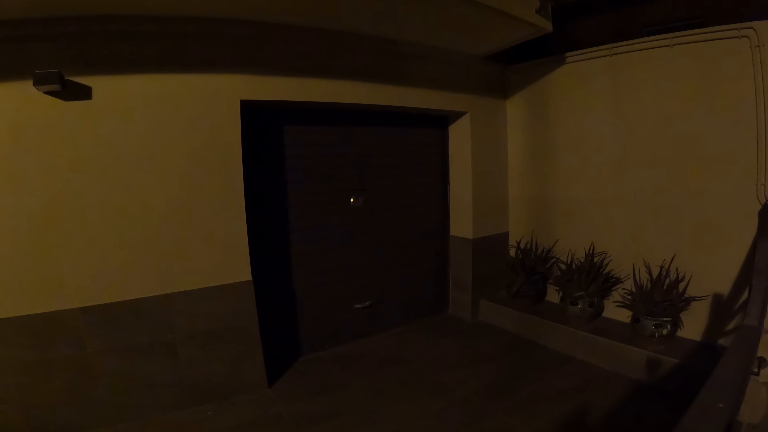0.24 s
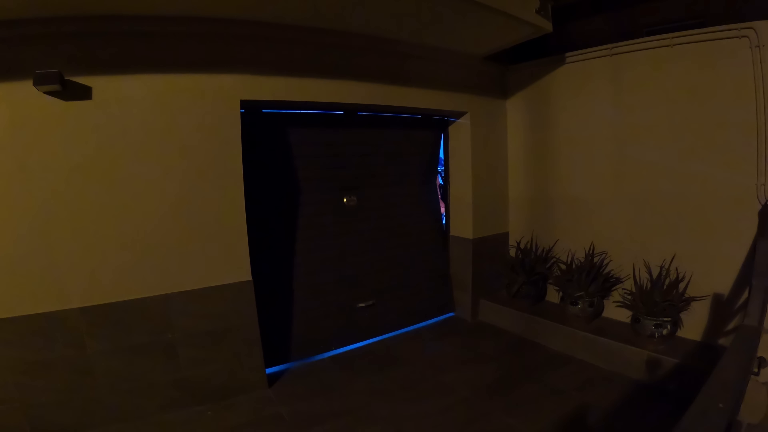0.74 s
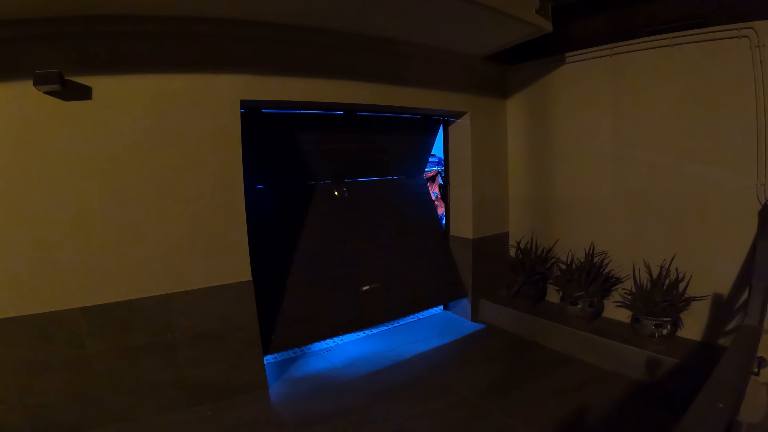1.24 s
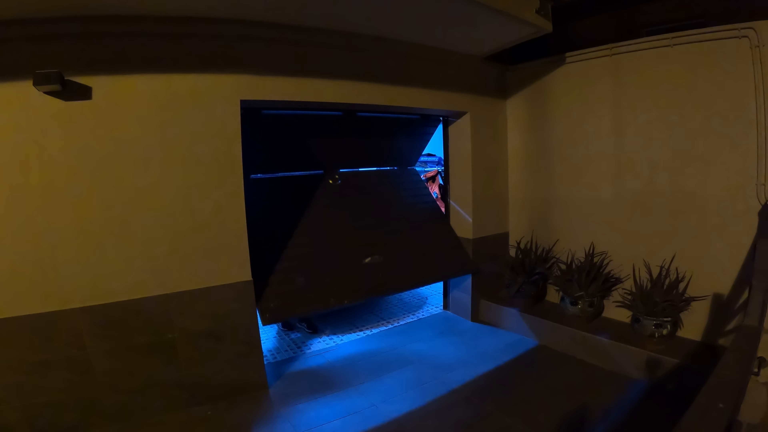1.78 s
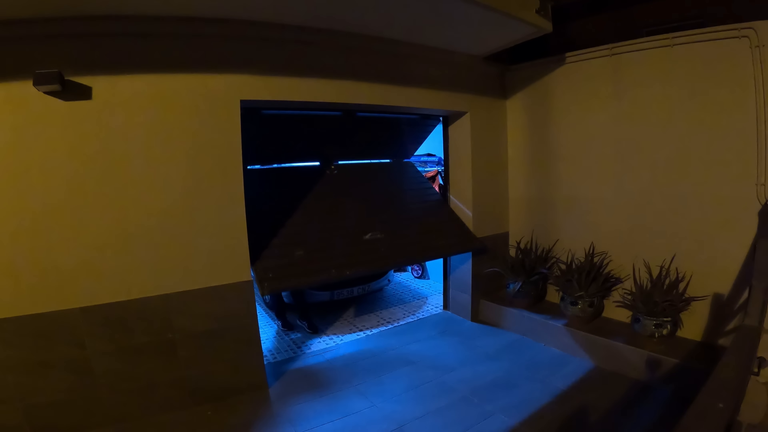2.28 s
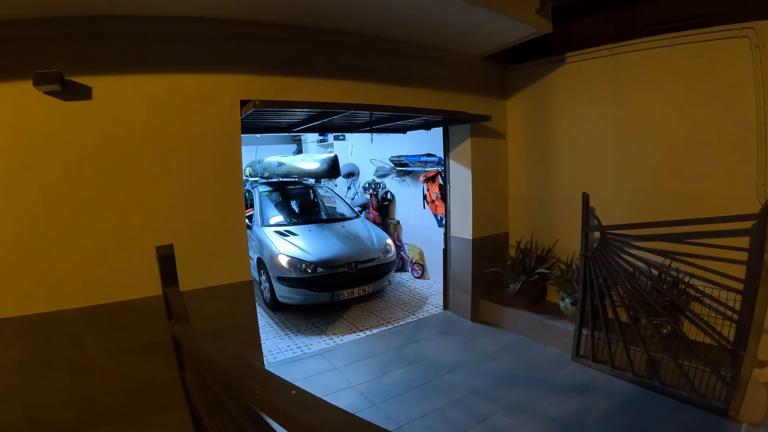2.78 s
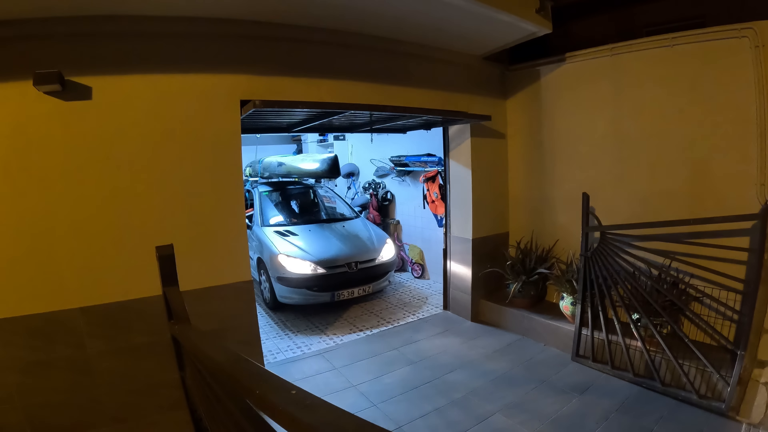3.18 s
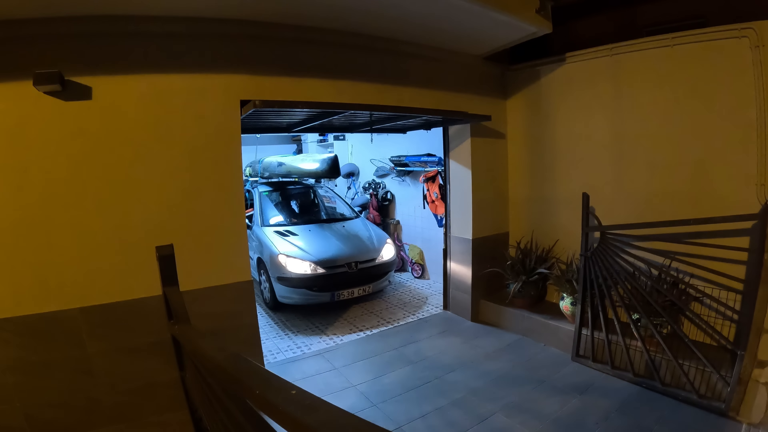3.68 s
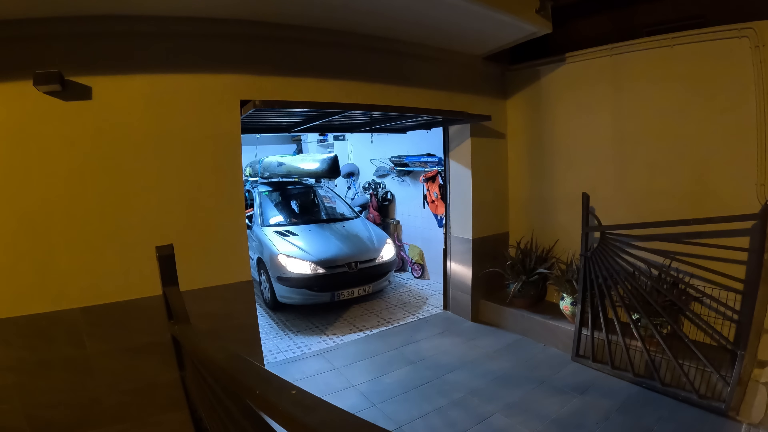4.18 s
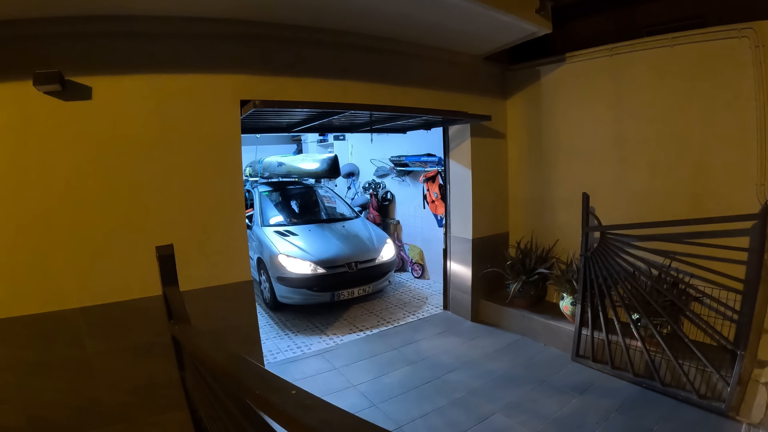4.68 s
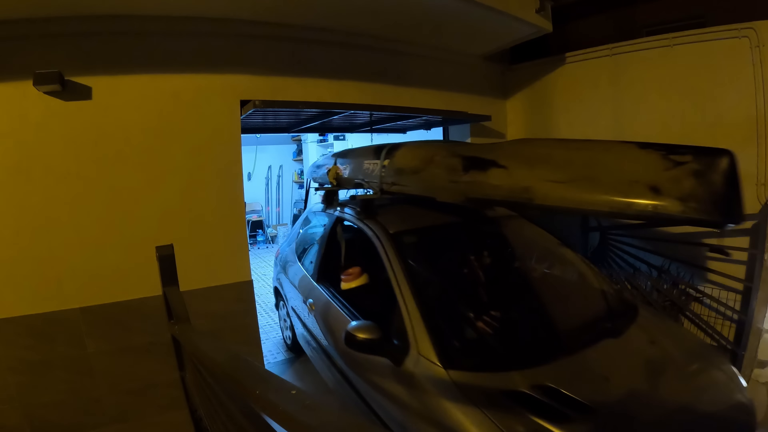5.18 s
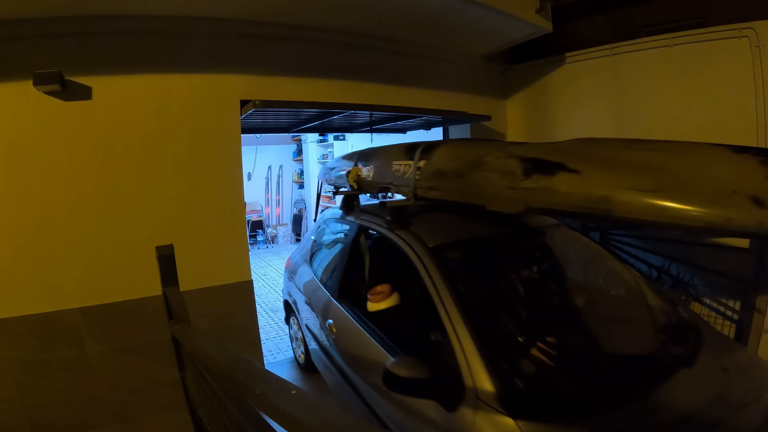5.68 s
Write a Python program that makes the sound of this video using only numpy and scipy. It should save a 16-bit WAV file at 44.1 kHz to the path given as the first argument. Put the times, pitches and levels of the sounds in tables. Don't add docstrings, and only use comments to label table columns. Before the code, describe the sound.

A sheet-metal garage door rattles, booms and squeaks open, then a starter motor grinds, the engine catches with pops, and a car idles close by.

```python
import sys
import numpy as np
from scipy import signal
from scipy.fft import rfft, irfft, next_fast_len
from scipy.io import wavfile
from scipy.ndimage import uniform_filter1d

SR = 44100
rng = np.random.default_rng(int(sys.argv[2]) if len(sys.argv) > 2 else 0)


def boost_factor(decibels):
    exponent = np.asarray(decibels, float) / 20
    return 10 ** exponent


def persist_wave(psi):
    counts = np.round(np.clip(psi, -1, 1) * 32767).astype(np.int16)
    wavfile.write(sys.argv[1], SR, np.atleast_2d(counts).T)


N = 261954
SIZE = next_fast_len(N + SR)
T = np.arange(N) / SR
HZ = np.maximum(np.fft.rfftfreq(SIZE, 1 / SR), 1.)

SCENE_CHANGES_S = (2.783, 4.912)

# pitch_hz, level_db (per Hz)
DOOR_COLOUR = [(29, -15.5), (50, -1.5), (70, -7.5), (118, -10), (195, -19), (380, -14), (778, -22.5),
               (1050, -20.5), (1400, -24), (2280, -31.5), (3420, -31.5), (5910, -39), (6660, -33),
               (7330, -46.5), (9310, -49.5), (15000, -63.5)]
# time_s, level_db
DOOR_TRAVEL = [(0.012, -49.5), (0.06, -45.5), (0.23, -40), (0.32, -49), (0.41, -56.5), (0.445, -55),
               (0.49, -35), (0.6, -44), (0.82, -54), (0.94, -46.5), (1.05, -47.5), (1.15, -46),
               (1.6, -46.5), (1.85, -40), (2.03, -38), (2.2, -38.5), (2.4, -40.5), (2.78, -46)]
# start_s, peak_db, body_db (against peak), edge_db (against peak)
KNOCKS = [(0.019, -38, -10, -22), (0.035, -26, 4.5, -32.5), (0.088, -33.5, 9, -27.5),
          (0.164, -29, -4.5, -32), (0.2195, -32.5, 2, -36.5), (0.4539, -41, 5.5, -30.5),
          (0.4937, -31, 12, -35), (0.6411, -39, 13.5, -34), (0.731, -32, -15.5, -24.5),
          (0.7994, -34.5, -15.5, -26.5), (0.8594, -37, -10, -27.5), (0.9225, -33, 3, -11.5),
          (0.9486, -22.5, 1, -23.5), (0.9933, -21, -23.5, -11), (1.2897, -38, 11, -36),
          (1.389, -32.5, 7, -26), (1.411, -15, -0.5, -17), (1.5045, -30, 3.5, -17),
          (1.6442, -39.5, 2.5, -17.5), (1.7738, -25, 7, -14.5), (1.983, -29.5, -12.5, -12),
          (2.0394, -32, 7, -28.5), (2.1226, -26.5, 1, -16.5), (2.1876, -25, -6, -28),
          (2.2692, -33.5, -4, -31), (2.4794, -43.5, -5.5, -16), (2.5991, -36, 13, -26.5),
          (2.713, -33, 7.5, -39.5), (2.722, -30, 7, -39.5)]
# peak_s, level_db, rise_s (per 20 dB), fall_s (per 20 dB)
BOOMS = [(0.23, -37.5, 0.1874, 0.2), (0.49, -20, 0.053, 0.4298), (0.94, -30.5, .4, 0.3),
         (1.11, -35.5, 0.23, 1.2), (1.53, -34, 0.16, 0.8), (1.99, -33.5, 0.496, 0.1722),
         (2.2, -37.5, .15, 0.7291), (2.68, -38, 1, -0.9571)]
# peak_s, level_db, rise_s (per 20 dB), fall_s (per 20 dB)
SWAYS = [(0.596, -32.5, .4, -4.5), (0.666, -26, 0.045, -0.23), (0.77, -27.5, 0.071, 0.3419),
         (0.97, -35, .9, -1.5), (1.242, -39.5, 0.1002, 2), (1.558, -20, 0.23543, 0.1299),
         (1.72, -32.5, 0.34, -0.3), (1.855, -28, 0.1032, 0.16), (2.09, -36, 0.152, -0.1),
         (2.166, -37.5, 0.060116, -0.8)]
# peak_s, level_db, rise_s (per 20 dB), fall_s (per 20 dB)
THUMPS = [
    (.474, -17, .04, .06),
    (0.497, -16, 0.05, 0.056),
    (0.584, -31.5, 0.0984, 0.17),
    (0.72, -34, 0.05, 0.027),
]
# peak_s, level_db, rise_s (per 20 dB), fall_s (per 20 dB)
DRONES = [
    (2.168, -44.5, .03, 1.33),
    (2.766, -37, 0.36543, 0.0937),
]
# peak_s, pitch_hz, level_db, rise_s (per 20 dB), fall_s (per 20 dB)
PANEL_RINGS = [(.065, 1062, -42, .03, -0.1), (.085, 521, -43.5, .04, 0.4), (.12, 1195, -41, .03, 0.01),
               (.2, 262.7, -41, .06, 0.33), (.23, 1050, -50.5, .02, -0.2), (.5, 557, -40, .03, 0.26),
               (.655, 1036, -50, .02, 0.24), (.985, 455, -41, .03, 0.17), (1.0, 292, -35.5, .04, 0),
               (1.09, 70, -36.5, .06, 0.3), (1.415, 656, -35.5, .015, 0.11),
               (1.418, 1018, -37.5, .015, 0.16), (1.43, 408, -35, .03, .12), (1.525, 959, -34, .03, 0.0938),
               (1.87, 397, -40.5, .06, 0.02), (2.22, 857, -42, .04, 0.1), (1.8, 1127, -40, .02, 0.24),
               (2.135, 1066, -38, .03, 0), (2.2, 1874, -38.5, .02, .04), (2.61, 1350, -48, .02, 0.2),
               (2.735, 1225, -42.5, .03, .06), (.33, 59.7, -49, .1, -1), (1.15, 254, -43, .05, 0.04),
               (1.52, 105, -34, .05, .06), (1.87, 132, -39.5, .05, 0.3)]
# time_s, pitch_hz, level_db
SQUEAKS = [
    [(.728, 3462, -46), (.743, 3465, -29), (.8, 3470, -44), (.816, 3475, -52), (.833, 3470, -46),
     (.87, 3472, -52), (.95, 3470, -60)],
    [(1.045, 4520, -46), (1.056, 4460, -35), (1.068, 4420, -36), (1.1, 4430, -44), (1.2, 4400, -58)],
    [(1.105, 1790, -46), (1.122, 1790, -29), (1.17, 1800, -31), (1.2, 1825, -33), (1.215, 1850, -36),
     (1.238, 1825, -32), (1.27, 1845, -37), (1.305, 1820, -37.5), (1.34, 1815, -46), (1.4, 1800, -53)],
]
# peak_s, level_db, rise_s (per 20 dB), fall_s (per 20 dB)
SLIPS = [
    (.756, -45, .012, .011),
    (0.804, -42.5, 0.0099, .015),
]
# time_s, pitch_hz, level_db
SCRAPE = [
    (1.058, 4380, -36),
    (1.07, 4180, -24),
    (1.08, 3950, -29),
    (1.092, 4050, -42),
    (1.2, 4100, -53),
]

# pitch_hz, level_db (per Hz)
STREET_COLOUR = [(15, -38), (25, -6), (38, -10), (77, -34), (158, -14), (293, -16), (515, -26),
                 (856, -25.5), (1310, -20.5), (2700, -43.5), (6540, -38), (8100, -46), (15000, -56)]
# peak_s, level_db, rise_s (per 20 dB), fall_s (per 20 dB)
PASSING_CARS = [
    (3.49, -56, 0.203, 0.3),
    (3.65, -54.5, 0.2346, 6),
]
# start_s, level_db, centre_hz, width_hz, fade_s (to -60 dB)
RUSTLES = [(2.805, -78.5, 6100, 1200, 0.393), (2.887, -72, 6012, 1800, 0.3),
           (3.003, -76, 6160, 1800, 0.174), (3.004, -75, 2784, 900, 0.286), (3.385, -72, 3491, 1203, 0.372),
           (3.385, -77, 6040, 2000, 1), (3.44, -76.5, 4290, 1198, 0.385), (3.565, -74.5, 4205, 1600, 0.767)]

# pitch_hz, level_db (per Hz)
START_COLOUR = [(47, -22), (80, 0.5), (93, -4.5), (210, -3.5), (255, -1), (404, -2.5), (747, -11.5),
                (993, -9), (2490, -16.5), (3860, -14), (4400, -17.5), (6530, -10.5), (7280, -25.5),
                (10600, -30.5), (15000, -52.5)]
# pitch_hz, width_hz, level_db
GEARS = [(984.6, 40, 0), (2300, 18, -6), (2640, 27, -6), (3370, 52, -6), (4659.7, 99.5, -7),
         (5246, 21.4, -6), (5400, 29, -6), (5410, 37, -3), (6660, 71, -4), (6677.5, 50, -4)]
# time_s, level_db
SPIN = [(3.66, -54), (3.895, -46.5), (4.12, -45.5), (4.26, -37.5), (4.35, -37), (4.503, -30), (4.621, -52),
        (4.92, -56)]
# peak_s, level_db, rise_s (per 20 dB), fall_s (per 20 dB)
CLASH = [
    (3.672, -5, 0.01303, 0.2542),
    (3.703, 0, 0.0872, 0.1192),
    (3.747, -8, .2, 0.28),
]
# peak_s, level_db, rise_s (per 20 dB), fall_s (per 20 dB)
STROKES = [
    (3.968, -0.5, 0.1, 0.295),
    (4.15, 0, 0.057, 0.23),
    (4.335, 0.5, 0.1313, 0.027),
    (4.365, 3, 0.026, 0.25),
]
# peak_s, level_db, rise_s (per 20 dB), fall_s (per 20 dB)
RUNNING = [
    (4.47, -0.5, 0.1509, 0.6724),
    (4.88, -4.5, 1, 0.831),
]
# spin_slope, spin_db, clash_db, stroke_db, running_db
GRIND = [
    (.3, -62, -40, -63, -35.5),
    (.3, -62.5, -40.5, -41, -41.5),
    (.3, -41, -25.5, -35, -43.5),
    (.6, -43, -44, -41.5, -63),
    (1.0, -41, -31, -43.5, -53),
]
# peak_s, level_db, rise_s (per 20 dB), fall_s (per 20 dB)
SHAKES = [
    (3.747, -40.5, 0.04834, 0.79),
    (4.035, -35, 0.347, 0.0944),
    (4.257, -35.5, 0.398, .9),
    (4.409, -25, 0.053, .08),
    (4.673, -46, 0.89, 0.875),
]
# peak_s, pitch_hz, level_db, rise_s (per 20 dB), fall_s (per 20 dB)
HOUSING_RINGS = [(3.71, 375, -39, 0.036, 0.17), (3.74, 1005, -35, 0.034, .2),
                 (3.765, 1700, -40, .03, 0.092), (3.82, 1110, -37, .03, .04), (3.98, 610, -39, 0.044, .06)]
# time_s, firing_rate_hz
CATCH = [(3.8, 30.14), (4.14, 30.63), (4.36, 35.63), (4.51, 30.7), (4.6, 29.2), (4.92, 28.85)]
# peak_s, level_db, rise_s (per 20 dB), fall_s (per 20 dB)
BURSTS = [(3.842, -32, 0.0604, 0.1), (4.036, -36.5, 0.03816, -1.177), (4.23, -42, .9, -0.5749),
          (4.32, -22, 0.0868, 1.5), (4.44, -29.5, 0.565, -0.767), (4.535, -16, 0.09256, 0.15),
          (4.64, -27, .15, .5), (4.69, -26.5, .2, .08), (4.79, -29.5, .1, .5), (4.9, -24, 0.4378, .5)]
# peak_s, level_db, rise_s (per 20 dB), fall_s (per 20 dB)
MOAN = [
    (4.006, -30.5, 0.05624, 0.08),
    (4.178, -42, 0.074, 2.702),
    (4.382, -37, 0.05641, -0.34),
    (4.478, -35, 0.1974, 0),
]
# time_s, pitch_hz, level_db
WHINE = [(3.95, 434, -61.5), (4.0, 455, -49), (4.32, 434, -41), (4.364, 418, -40), (4.394, 410.2, -53),
         (4.412, 404.1, -34), (4.446, 422.3, -46.5), (4.5, 396, -50.5)]
# peak_s, peak_db, pitch_hz
POPS = [(4.3616, -11, 380), (4.3837, -12.5, 380), (4.4127, -13.5, 332), (4.439, -24.5, 524),
        (4.455, -21, 400), (4.476, -24.5, 300), (4.493, -25, 494)]

# time_s, firing_rate_hz
IDLE = [(4.9, 27.13), (5.286, 27.06), (5.48, 26.85), (5.592, 27.32), (5.806, 26.9), (5.94, 27.02)]
# multiple (of firing rate), level_db
FIRING = [(1, 1), (2, -8), (3, -8.5), (4, -30), (5, -16.5), (6, -26), (7, -22), (8, -15.5), (9, -19.5),
          (10, -16), (11, -23), (12, -16), (13, -27), (14, -22), (15, -24), (16, -21.5), (17, -18),
          (18, -20), (19, -22), (20, -27), (21, -25.5), (22, -27)]
# pitch_hz, level_db (per Hz)
IDLE_COLOUR = [(53, -31), (90, -6.5), (109, -13.5), (170, -11.5), (300, -7), (448, -6.5), (765, -11),
               (1920, -15), (2760, -26.5), (3810, -24.5), (4820, -31), (6370, -24), (7240, -40),
               (10600, -48), (15000, -68)]
# peak_s, level_db (against gas), rise_s (per 20 dB), fall_s (per 20 dB)
TAPS = [
    (5.331, 3, .004, 0),
]
# peak_s, pitch_hz, level_db, rise_s (per 20 dB), fall_s (per 20 dB)
BODY_RINGS = [
    (4.97, 448, -40, .06, 0.094),
    (5.72, 455, -44.5, 0.092, .2),
]

# pitch_hz, phase_rad
PORT_PHASE = [(100, 0), (1000, -.25), (2840, -.5), (6700, 0), (7600, -.4), (13000, -.1)]
# pitch_hz, level_db
PORT_BALANCE = [(100, 0), (300, -.4), (700, -1), (1400, -1.3), (5000, -.4), (9000, 1.6), (14000, 2.6)]
# pitch_hz, level_db
PORT_DIFFUSE = [(30, -33), (70, -44), (250, -28), (700, -15), (1500, -12), (3000, -10), (5500, -14),
                (9000, -11), (13000, -1.5)]


def along(points):
    hz, value = np.transpose(points)
    return np.interp(np.log(HZ), np.log(np.maximum(hz, 1)), value)


def through(x, gain):
    return irfft(rfft(x, SIZE) * gain, SIZE)[:N]


def unit(x):
    return x / np.sqrt(np.mean(x ** 2))


def play(table):
    s, *columns = np.transpose(table)
    gate = np.clip(np.minimum(T - s[0], s[-1] + 0.0074 - T) / 0.013, 0, 1)
    return [gate] + [np.interp(T, s, column) for column in columns]


def walk(rate):
    hold = int(SR / rate)
    steps = np.repeat(rng.standard_normal(N // hold + 1), hold)
    return unit(uniform_filter1d(uniform_filter1d(steps, hold), hold)[:N])


def swells(rows):
    out = np.full(N, -120.)
    for s, db, rise_s, fall_s in rows:
        drop = np.maximum((s - T) / abs(rise_s), (T - s) / abs(fall_s))
        out = np.maximum(out, db - 20 * drop)
    return out


def bands(colour, edges_hz, peaks=(), ring_db=0., grain_db=0., rate=150, flicker_db=0.5, parts=0):
    gain = boost_factor(along(colour))
    for hz, width, _ in peaks:
        gain = gain * (1 + boost_factor(ring_db) / (1 + (2 * (HZ - hz) / width) ** 2))
    grains = rng.standard_normal(N) * boost_factor(grain_db * walk(rate))
    contacts = rfft(grains + parts, SIZE) * gain
    above = [np.ones_like(HZ)] + [np.sqrt(1 / (1 + (edge / HZ) ** 6)) for edge in edges_hz] + [0 * HZ]
    layers = []
    for lower, upper in zip(above, above[1:]):
        band = irfft(contacts * lower * np.sqrt(1 - upper ** 2), SIZE)[:N]
        layers.append(unit(band) * boost_factor(flicker_db * walk(21.92)))
    return layers


def tone(gate, hz, db, rough=.0, rate=200, flutter_db=0., upper_db=(), bright=0.):
    on = gate * (db > -75) > 0
    phase = 2 * np.pi * np.cumsum((hz * (1 + rough * walk(rate)))[on]) / SR
    out = on * gate * boost_factor(flutter_db * walk(rate / 2))
    levels = [db[on]] + [db[on] + up + bright * (db[on] - db.max()) for up in upper_db]
    out[on] *= sum(np.sqrt(2) * boost_factor(x) * np.sin((k + 1) * phase) for k, x in enumerate(levels))
    return out


def lone(rows):
    neighbour_share, neighbour_db = 0.028, -8.5
    out = np.zeros(N)
    for s, hz, db, rise_s, fall_s in rows:
        on = slice(max(int((s - 2 * abs(rise_s)) * SR), 0), int((s + 2 * abs(fall_s)) * SR))
        age = T[on] - s
        pair = np.sin(2 * np.pi * hz * age)
        pair += boost_factor(neighbour_db) * np.sin(2 * np.pi * hz * (1 + neighbour_share) * age)
        level_db = db - 20 * np.maximum(-age / abs(rise_s), age / abs(fall_s))
        out[on] += np.sqrt(2) * boost_factor(level_db) * pair
    return out


def room(x, t60, wet_db):
    t = T[:SR]
    echoes = rng.standard_normal(SR) * boost_factor(-60 * t / t60) * (t > .008)
    echoes /= np.sqrt(np.sum(echoes ** 2))
    return x + boost_factor(wet_db) * through(x, rfft(echoes, SIZE) / (1 + (HZ / 9000) ** 2))


def small_parts(count, db, decay_s):
    out, age = np.zeros(N + 4096), T[:4096]
    for when, pitch, size in rng.random((count, 3)):
        i = int(when * N)
        ring = np.sin(2 * np.pi * (400 + 12000 * pitch) * age) * age / decay_s * np.exp(-age / decay_s)
        out[i:i + 4096] += boost_factor(db + 12.591 * size + 6.0 * pitch) * ring
    return out[:N]


def rollers_and_knocks(gate, travel_db, parts):
    rattle_db = -56 + 1.02 * (travel_db + 44.5)
    rattle_db = rattle_db - 12 * np.maximum(T - 1.994, 0)
    rattle, body, edge = boost_factor(2 * rattle_db), boost_factor(2 * travel_db), boost_factor(2 * (rattle_db - 27.5))
    age = T[:SR]
    crack = (1 - np.exp(-age / .002)) * (1 + 2.5 * np.exp(-age / .012))
    for s, db, body_rel_db, edge_rel_db in KNOCKS:
        t60 = 0.32 + 0.0181 * (db + 30.5)
        first = int((s - .002) * SR)
        after = slice(first, first + SR)
        blow = boost_factor(2 * (db - 12.5))
        rattle[after] += blow * crack * boost_factor(-120 * age / t60)
        edge[after] += blow * np.sqrt(crack) * boost_factor(2 * edge_rel_db - 140 * age / t60)
        body[after] += blow * boost_factor(2 * body_rel_db - 80 * age / t60) * (1 - np.exp(-age / 0.015))
    layers = bands(DOOR_COLOUR, (58, 210, 1700, 7400), grain_db=1.34, flicker_db=1.12, parts=parts)
    _, low, mid, high, top = layers
    metal = gate * (np.sqrt(rattle) * high + np.sqrt(body) * mid + np.sqrt(edge) * top)
    return room(metal, t60=0.61, wet_db=-12.0) + gate * low * boost_factor(swells(BOOMS) - 3)


def panel_sway(gate):
    lift_s, tighten_s = .45, .25
    lifted = T > lift_s
    sway_hz = 45.038 - 17 * np.exp(-np.maximum(T - lift_s, 0) / tighten_s)
    sway = tone(lifted, sway_hz, swells(SWAYS), rough=.12, rate=40, flutter_db=2.5)
    thump = tone(lifted, 92.9, swells(THUMPS), rough=0.045, rate=40)
    drone = tone(gate, 156.6, swells(DRONES), rough=0.03074, rate=49, flutter_db=2.0)
    return sway + thump + drone


def hinge_squeaks(gate):
    first, second, third = SQUEAKS
    squeak = tone(*play(first), rough=0.0055, rate=150, flutter_db=3.5, upper_db=(-7, -31, -43), bright=0.31)
    squeak += tone(gate, 1155, swells(SLIPS), rough=0.018, rate=250,
                   upper_db=(-9.0, -5.0, -4.5, -3, -6.5, -16.5))
    squeak += tone(*play(second), rough=.012, rate=300, flutter_db=2.5, upper_db=(-13, -28), bright=.8)
    squeak += tone(*play(SCRAPE), rough=.05, rate=700, flutter_db=2.5, upper_db=(-24,))
    squeak += tone(*play(third), rough=.008, rate=250, flutter_db=2.5,
                   upper_db=(-5, -15, -32, -33, -42, -46), bright=.55)
    return room(squeak, t60=.3, wet_db=-11)


def door(parts):
    gate, travel_db = play(DOOR_TRAVEL)
    metal = rollers_and_knocks(gate, travel_db, parts)
    return metal + panel_sway(gate) + lone(PANEL_RINGS) + hinge_squeaks(gate)


def street():
    hum_db = -66.5 + 3.5 * walk(8.986)
    traffic_db = np.maximum(-60 + 0.74 * walk(4.24), swells(PASSING_CARS))
    hum, traffic, hiss = bands(STREET_COLOUR, (110, 2500), grain_db=-1.1)
    out = hum * boost_factor(hum_db) + traffic * boost_factor(traffic_db) + hiss * boost_factor(-83)
    for s, db, hz, width, t60 in RUSTLES:
        age = np.maximum(T - s, 0)
        rustle = unit(through(hiss, np.exp(-((HZ - hz) / width) ** 2 * 2)))
        out += rustle * boost_factor(db - 60 * age / t60) * (1 - np.exp(-age / 0.0079))
    return out


def gear_grind(spin_db, parts):
    clash, strokes, running = (boost_factor(2 * swells(rows)) for rows in (CLASH, STROKES, RUNNING))
    layers = bands(START_COLOUR, (200, 700, 2400, 4400), GEARS, ring_db=-7.0, grain_db=1.0, rate=250,
                   parts=parts)
    grind = 0
    for layer, (slope, spin_part_db, clash_db, stroke_db, running_db) in zip(layers, GRIND):
        power = boost_factor(2 * (spin_part_db + slope * (spin_db + 40)))
        power = power + boost_factor(2 * clash_db) * clash + boost_factor(2 * stroke_db) * strokes
        power = power + boost_factor(2 * running_db) * running
        grind = grind + layer * np.sqrt(power)
    return grind


def block_shake():
    phase = 2 * np.pi * np.cumsum(12.0 * (1 + 0.08321 * walk(6.4))) / SR
    return np.sqrt(2) * boost_factor(swells(SHAKES)) * np.sin(phase)


def first_firings():
    return tone(*play(CATCH), swells(BURSTS), rough=0.08153, rate=27, flutter_db=1.5, upper_db=(-7,), bright=0.23)


def starter_tones(gate):
    sag_hz, sag_s = 59.7, 0.052
    moan_hz = 256.87 + sum(sag_hz * np.exp(-((T - row[0]) / sag_s + 1.1456) ** 2 * 2) for row in MOAN)
    moan = tone(gate, moan_hz, swells(MOAN), rough=0.0206, rate=60, upper_db=(-13, -16, -18))
    return moan + tone(*play(WHINE), rough=0.01909, rate=60)


def exhaust_pops():
    pops = 0
    for s, db, hz in POPS:
        age = T - s
        pops = pops - boost_factor(db) * np.cos(2 * np.pi * hz * age) * np.exp(-(age / 0.001328) ** 2)
    return room(pops, t60=0.5, wet_db=-3.0)


def start(parts):
    gate, spin_db = play(SPIN)
    machine = gate * (gear_grind(spin_db, parts) + block_shake())
    return machine + lone(HOUSING_RINGS) + first_firings() + starter_tones(gate) + exhaust_pops()


def idle():
    _, hz = play(IDLE)
    turns = np.cumsum(hz * (1 + .003 * walk(15))) / SR
    spread = .03
    hum = 0
    for k, db in FIRING:
        level = np.sqrt(2) * boost_factor(-32.5 + db + 0.9 * walk(8.9))
        hum = hum + level * np.sin(2 * np.pi * (round(k) * turns - spread * k ** 2))
    hum *= 1 + 0.15 * (1 + .5 * walk(3.3)) * np.sin(np.pi * turns)
    puff = 1 + .16 * (1 + 0.3 * walk(27)) * np.cos(2 * np.pi * (turns - .05))
    puff = puff + boost_factor(swells(TAPS))
    gas, valves = bands(IDLE_COLOUR, (2500,), grain_db=-0.9, rate=140, flicker_db=0.3)
    return hum + lone(BODY_RINGS) + puff * (gas * boost_factor(-35) + valves * boost_factor(-48))


def scene():
    first, last = (np.clip((T - s) / fade + .5, 0, 1) for s, fade in zip(SCENE_CHANGES_S, (.003, .03)))
    parts = small_parts(count=1100, db=-18, decay_s=0.014958)
    x = door(parts) * (1 - first)
    x = x + (street() + start(parts)) * first * np.sqrt(1 - last)
    x = x + idle() * np.sqrt(last)
    side = through(x, 1j * boost_factor(along(PORT_DIFFUSE))) * walk(120)
    tilt = boost_factor(along(PORT_BALANCE) / 2) * np.exp(1j * along(PORT_PHASE) / 2)
    return np.array([through(x, tilt) + side, through(x, 1 / tilt) - side])


def low_pass(x):
    return signal.sosfilt(signal.butter(12, 15660, fs=SR, output="sos"), x)


def record(dry):
    mix = np.array([through(x, 1 / (1 + (HZ / 14400) ** 24)) for x in dry])
    return low_pass(mix)


dry = scene()
out = record(dry)
persist_wave(out)
```